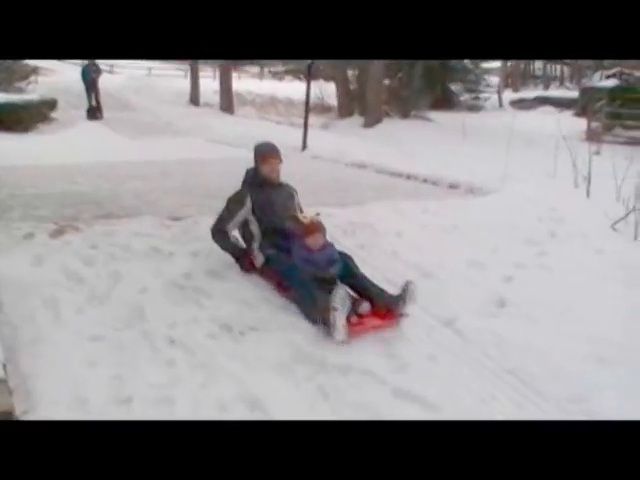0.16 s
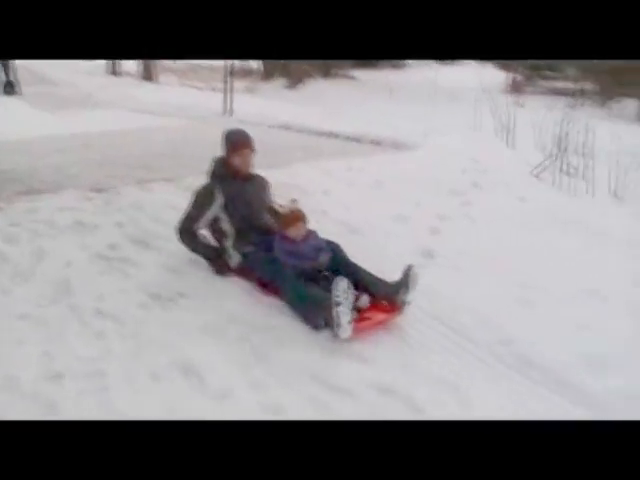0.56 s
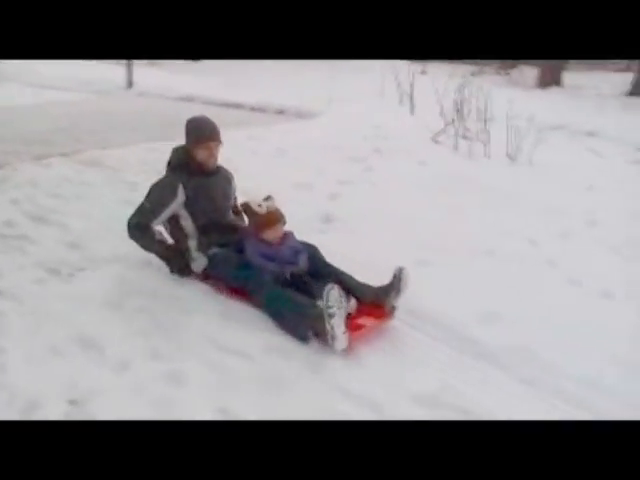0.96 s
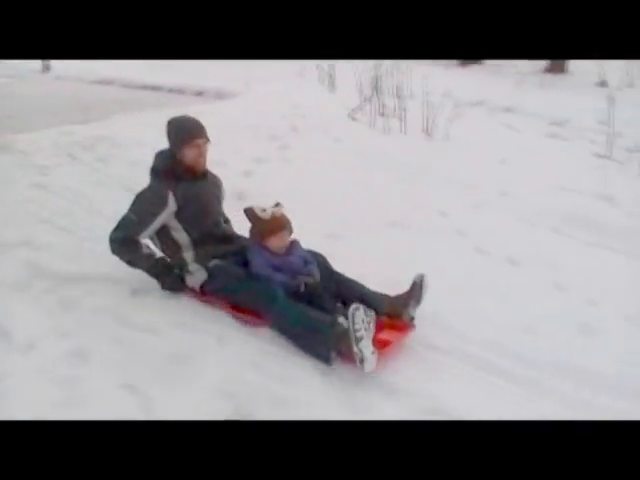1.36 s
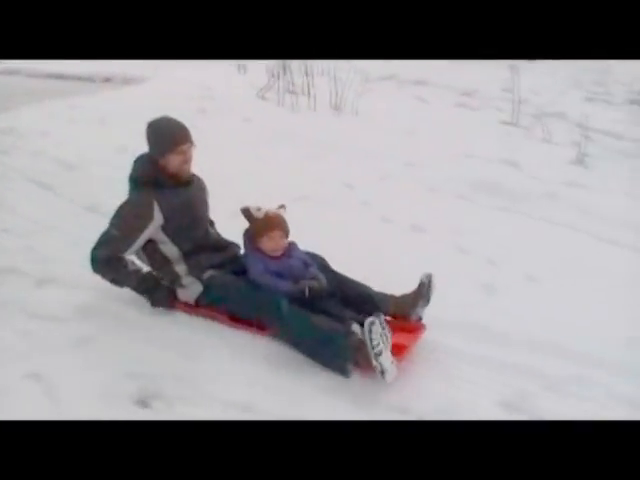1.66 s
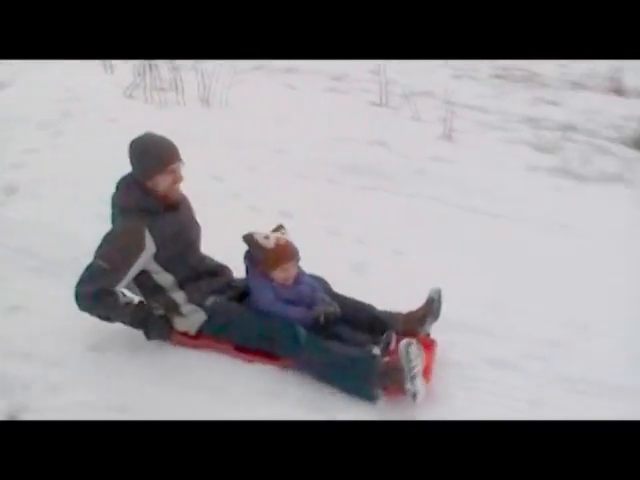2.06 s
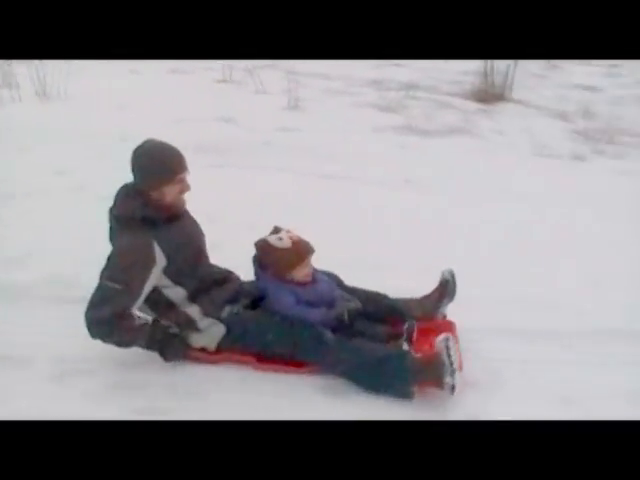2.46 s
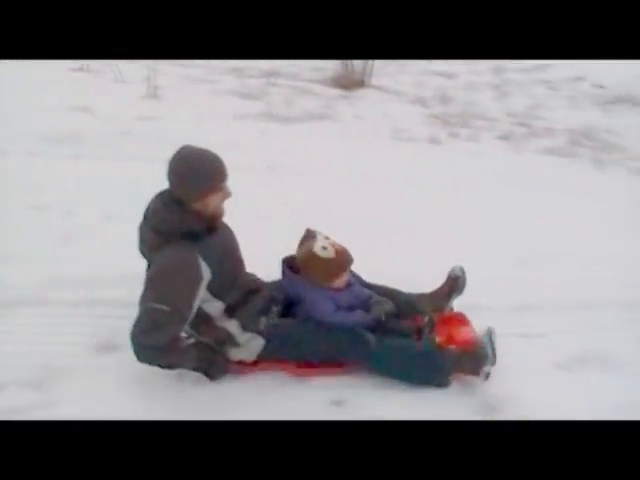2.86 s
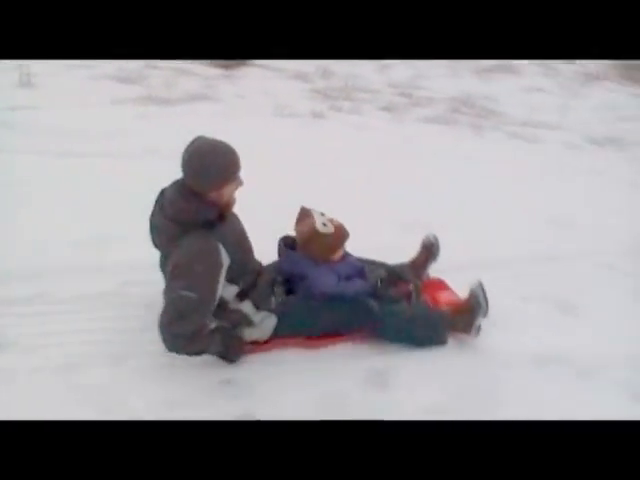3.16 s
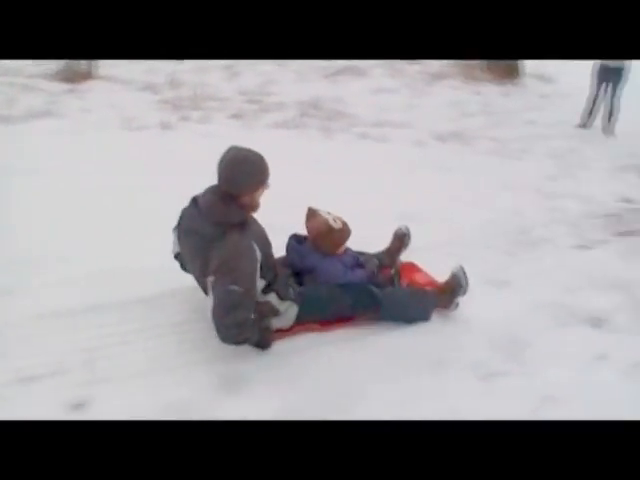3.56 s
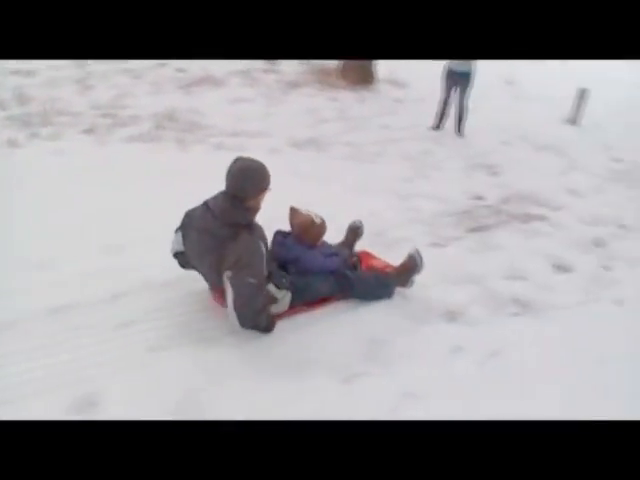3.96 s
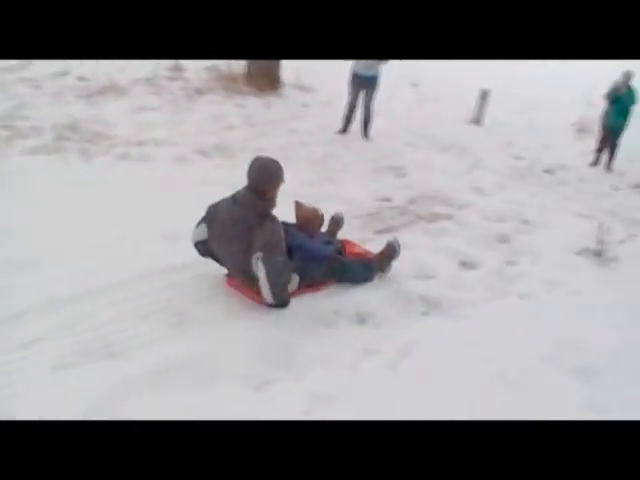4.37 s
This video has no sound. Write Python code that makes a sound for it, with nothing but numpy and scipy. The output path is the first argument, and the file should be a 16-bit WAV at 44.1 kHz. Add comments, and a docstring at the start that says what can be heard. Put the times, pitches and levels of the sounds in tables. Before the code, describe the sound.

A loaded plastic sled scrapes past over trodden snow with a grainy hiss, sharp crunches, icy snaps, hollow knocks and brief squeaks.

```python
"""Sled sliding past over snow

A loaded plastic sled slides past a camera over trodden snow. Filtered grainy noise makes the hiss of crushed
crystals, the hull's drumming and the rumble; plain noise makes the powder spray. Lumps crunch as noise bursts
and ring a hull resonance. Crusts snap as damped modes, the belly thuds as low decaying sines, and the plastic
squeaks in short gliding tones. The image opens briefly now and then, toward the right."""
import sys
import numpy as np
from scipy import signal
from scipy.fft import rfft, irfft, next_fast_len
from scipy.io import wavfile
from scipy.ndimage import uniform_filter1d

SR = 44100
rng = np.random.default_rng(int(sys.argv[2]) if len(sys.argv) > 2 else 0)


def dump(signal):
    """Clip the signal to [-1, 1] and save it as 16-bit WAV at the path in sys.argv[1]."""
    limited = np.clip(np.atleast_2d(signal).T, -1, 1)
    pcm = np.round(limited * 32767).astype(np.int16)
    wavfile.write(sys.argv[1], SR, pcm)


def gain_from_decibels(decibels):
    """Convert decibel values to linear amplitude factors."""
    exponent = np.asarray(decibels, float) / 20
    return 10 ** exponent


N = 199773
TIME = np.arange(N) / SR
REFERENCE_LOAD_DB = -25  # load changes are counted from here


def colour(x, table):
    """Shape a spectrum by (f/Hz, level/dB) points, joined on a log frequency axis."""
    hz, db = np.transpose(table)
    size = next_fast_len(N)
    f = np.maximum(np.fft.rfftfreq(size, 1 / SR), 1)
    gain = gain_from_decibels(np.interp(np.log(f), np.log(hz), db))
    return irfft(rfft(x, size) * gain, size)[..., :N]


def unit(x):
    """Scale to rms 1."""
    return x / np.sqrt(np.mean(x ** 2))


def walk(rate):
    """Random levels held for 1 / rate seconds and slewed, with rms 1."""
    hold = max(int(SR / rate), 2)
    levels = rng.standard_normal(N // 2 + 1)
    return unit(uniform_filter1d(levels[np.arange(N) // hold], hold // 2 + 1))


def grains(spread_db):
    """Dense breaking crystals: noise with a few much larger grains among its samples."""
    size = np.minimum(rng.exponential(size=N), 6)
    return unit(rng.standard_normal(N) * gain_from_decibels(spread_db * size))


def patches(x, edges_hz, rate, depth_db):
    """Split a sound into bands that flicker in level, each on its own; rises are capped."""
    f = np.fft.rfftfreq(N, 1 / SR)
    spectrum = rfft(x)
    out = np.zeros(N)
    for lo, hi in zip(edges_hz, edges_hz[1:]):
        flicker = gain_from_decibels(depth_db * np.minimum(walk(rate), 1.5))
        out += flicker * irfft(spectrum * ((f >= lo) & (f < hi)), N)
    return out


def burst(start, length, rise):
    """Pressure of one lump: quick rise, a short hold while it crumbles, then it is gone."""
    t = np.maximum(TIME[int(start * SR):int((start + .12) * SR)] - start, 0)
    return (1 - np.exp(-t / rise)) * np.exp(-(t / length) ** 2.3)


def add(into, start, piece):
    """Mix a piece in at a time in seconds."""
    i = int(start * SR)
    into[i:i + len(piece)] += piece


# the snow under the sled: (t/s, crushing load level/dB, crust hardness level/dB)
SNOW_TRACK = [(0, -26.5, -9), (.25, -25.5, 4), (.52, -23, -1), (.66, -25, 4.5), (.86, -24.5, -3),
              (1.1, -26.5, 11), (1.24, -28.5, -5), (1.55, -25, -3.5), (1.85, -22, 1), (1.98, -23, -2),
              (2.1, -21.5, -0.5), (2.28, -21, 0), (2.45, -22, -3), (2.64, -20, 5), (2.82, -22, 0.5),
              (3.1, -25, -3), (3.3, -23, 7), (3.46, -20, -2.5), (3.56, -25, 5), (3.8, -21.5, -0.5),
              (4.05, -20.5, 0), (4.35, -23, -3), (4.53, -23, -13)]
# the sled skips over hollows: (start t/s, length t/s, full drop in load level/dB; very short ones drop less)
HOLLOWS = [(0.062, 0.16, 3), (0.306, 0.17, 2.5), (0.693, 0.034, 2.5), (0.76, 0.06, 5.5), (0.896, 0.042, 6),
           (1.113, 0.12, 2.5), (1.247, 0.13, 2.5), (1.394, 0.12, 2), (1.59, 0.018, 1), (1.656, 0.17, 3.5),
           (2.625, 0.16, 5), (2.955, 0.076, 3), (3.596, 0.053, 4.5), (3.661, 0.043, 8.5),
           (3.773, 0.031, 6.5), (4.23, 0.089, 3.5)]


def load():
    """Crushing load in dB: the slow run of the track, cut by hollows and shaken by uneven snow."""
    lift_s, land_s = 0.041, 0.011  # the load fades into a hollow and returns at its far edge
    s, load_db, _ = np.transpose(SNOW_TRACK)
    lifted_db = np.zeros(N)
    for start, length, drop_db in HOLLOWS:
        fade = np.minimum((TIME - start) / lift_s, (start + length - TIME) / land_s)
        lifted_db += drop_db * np.clip(fade, 0, 1)
    return np.interp(TIME, s, load_db) - lifted_db + 0.046 * walk(40) + 0.29 * walk(100)


# spectrum of crushed crystals: (f/Hz, relative level/dB)
CRYSTAL_COLOUR = [(1060, -13), (1800, 1), (2520, -1.5), (2910, -7), (3780, -2.5), (6760, -0.5), (8140, 1),
                  (12100, -11.5), (12800, -16), (13500, -94)]


def hiss(change_db):
    """Crystals crush under the runners; the hiss follows the load fully."""
    crystals = unit(colour(grains(spread_db=2.5), CRYSTAL_COLOUR))
    # crystals of different size break at different moments
    crystals = patches(crystals, [0, 2600, 4200, 6500, 10000, 20000], rate=45, depth_db=1.23)
    # and the colour drifts in narrow patches
    narrow_hz = [0, 1500, 2000, 2500, 3100, 3700, 4400, 5200, 6000, 6900, 7900, 9000, 10300, 20000]
    crystals = patches(crystals, narrow_hz, rate=14, depth_db=1.5)
    return gain_from_decibels(REFERENCE_LOAD_DB + change_db) * crystals


# spectrum of the drumming hull: (f/Hz, relative level/dB)
HULL_COLOUR = [(210, -19), (350, -16), (600, 3), (993, 2.5), (1080, 2.5), (1360, 1.5), (1930, -2.5),
               (3000, -13), (3900, -15), (6600, -120)]


def drumming(change_db):
    """The hull drums with the load; harder snow excites the upper panels more than the belly."""
    passes_s, turn_s, shaded_db = 3.85, 0.19, -5.5  # once past, the riders shade the hull
    s, _, hard_db = np.transpose(SNOW_TRACK)
    bright_db = np.interp(TIME, s, hard_db) + 1.45 * walk(14)
    shade_db = shaded_db / (1 + np.exp((passes_s - TIME) / turn_s))
    hull_db = -2 + change_db + shade_db + 0.82 * walk(14)
    drum = unit(colour(grains(spread_db=3.5), HULL_COLOUR))
    drum = patches(drum, [0, 650, 950, 1400, 2000, 20000], rate=25, depth_db=1.5)
    belly = signal.sosfiltfilt(signal.butter(2, 1200, fs=SR, output="sos"), drum)
    upper_panels = drum - belly
    hull = gain_from_decibels(-bright_db / 2) * belly + gain_from_decibels(bright_db / 2) * upper_panels
    return gain_from_decibels(REFERENCE_LOAD_DB + hull_db) * hull


# spectrum of the rumble: (f/Hz, relative level/dB)
RUMBLE_COLOUR = [(53, -64), (90, -96), (140, -27), (210, -4.5), (344, -4.5), (500, 1.5), (650, -7.5),
                 (1100, -120)]


def rumble(change_db):
    """Low grainy noise that follows about half of each load change in dB and swells while the sled is close."""
    nearest_s, span_s, near_db = 3.07, 0.78, 4.5
    swell_db = near_db * np.exp(-((TIME - nearest_s) / span_s) ** 2)
    rumble_db = -14 + 0.53 * change_db + swell_db + 3.08 * walk(14)
    low = unit(colour(grains(spread_db=5.5), RUMBLE_COLOUR))
    low = patches(low, [0, 150, 260, 20000], rate=12, depth_db=2.0)
    return gain_from_decibels(REFERENCE_LOAD_DB + rumble_db) * low


# spectrum of the powder: (f/Hz, relative level/dB)
SPRAY_COLOUR = [(1200, -30), (2600, 0), (4200, 2), (7000, 3), (10000, 0), (12500, -11), (13500, -31)]


def spray():
    """Fine powder thrown up behind the sled: a thin hiss that swells slightly and never stops."""
    powder = unit(colour(rng.standard_normal(N), SPRAY_COLOUR))
    return gain_from_decibels(-34.5 + 1.5 * walk(3.5)) * powder


# lumps crushed: (t/s, crunch level/dB, hull ring level/dB re crunch, crumbling t/s, hull tone f/Hz)
LARGE_LUMPS = [(0.003, -41, 16, 0.05, 1050), (0.213, -26.5, 0.5, 0.065, 840), (0.475, -26, 3, 0.038, 960),
               (0.518, -22.5, 3, 0.022, 790), (0.58, -13.5, -16, 0.0035, 654),
               (0.607, -21.0, -18, 0.0038, 1700), (0.731, -14.5, -11, 0.0061, 900),
               (0.739, -16.5, -0.5, 0.01, 840), (0.755, -29, 2, 0.018, 1090),
               (0.821, -15, -0.5, 0.0069, 816), (0.856, -24, -0.5, 0.017, 820),
               (0.891, -26, 6.5, 0.0056, 754), (1.001, -23, -5, 0.013, 1240), (1.092, -21.5, -8, 0.02, 824),
               (1.21, -23.5, -8, 0.025, 1040), (1.234, -23, 5, 0.0066, 800), (1.289, -31, 9.5, 0.0054, 854),
               (1.29, -29.5, 8, 0.014, 1500), (1.312, -18.5, 6, 0.0056, 810),
               (1.366, -15.5, -16, 0.0078, 1140.0), (1.3695, -14.5, -7, 0.0043, 2150),
               (1.374, -25, 2, 0.008, 1290), (1.389, -15.5, -2.5, 0.0054, 1780),
               (1.404, -15.5, -7, 0.0036, 1840), (1.414, -30, 6, 0.0066, 940), (1.456, -30, 3, 0.019, 1500),
               (1.47, -30, 6, 0.0055, 710), (1.516, -15, -5, 0.0047, 1410), (1.522, -15, -9, 0.0086, 895),
               (1.584, -20, -4, 0.017, 1140.0), (1.606, -12, -10, 0.014, 1680),
               (1.621, -21, -1, 0.015, 940), (1.759, -27.5, 7.5, 0.0063, 770),
               (1.832, -29, 6, 0.0051, 1290), (1.846, -19, -4, 0.017, 1190), (1.885, -19.5, -3, 0.013, 850),
               (1.903, -18.5, -5, 0.017, 1850), (1.962, -20, 0, 0.022, 1190),
               (1.999, -16, -4, 0.0089, 1710), (2.055, -13, -12, 0.0064, 810),
               (2.08, -14.5, -16, 0.0077, 1600), (2.277, -16.5, 0, 0.0097, 1140),
               (2.625, -20, -14, 0.012, 1040), (2.645, -26, -2, 0.0035, 1030),
               (2.702, -17.5, -11, 0.006, 3900), (2.711, -28, 6, 0.0031, 1500),
               (2.776, -28, 2, 0.016, 1940), (2.788, -15.5, -1, 0.0099, 1150),
               (2.798, -17.5, 2.5, 0.028, 1115), (2.838, -19, 7, 0.0043, 1090),
               (2.843, -18.5, -8, 0.02, 2250), (2.9164, -21, -1, 0.031, 796),
               (2.94, -27.5, 5.5, 0.019, 1060), (3.039, -20, -7, 0.037, 1020.0),
               (3.117, -21.5, -4, 0.029, 813), (3.219, -21.5, -19, 0.023, 990),
               (3.314, -18.5, -11, 0.043, 840), (3.385, -13.5, -12, 0.011, 1710),
               (3.437, -17, -14, 0.012, 1730.0), (3.457, -19.5, -3.5, 0.041, 1060),
               (3.499, -24.5, 2.5, 0.023, 1490), (3.517, -33, -2, 0.02, 1210), (3.559, -34, 3, 0.016, 596),
               (3.651, -22, 0, 0.015, 1140), (3.683, -22, -4, 0.043, 1570), (3.761, -17, -3, 0.015, 645),
               (3.851, -24, -1, 0.027, 1450), (4.02, -21, -13, 0.017, 1610.0),
               (4.071, -23, -3, 0.011, 1550), (4.122, -18, -1.5, 0.017, 470), (4.149, -21, 2, 0.02, 665),
               (4.197, -23, -17, 0.026, 1860), (4.35, -20.5, -15, 0.016, 1430.0),
               (4.446, -16.5, -15, 0.0064, 860)]
# spectrum of a crumbling lump: (f/Hz, relative level/dB)
CRUNCH_COLOUR = [(760, -39), (1300, -0.5), (2320, -1.5), (4420, 0.5), (6190, 1.5), (8350, 3.5),
                 (11300, -10.5), (13000, -14)]


def lumps(change_db):
    """Each lump crumbles in coarse grains; the first blow and the crumbling ring the hull around one tone."""
    coarse = unit(colour(grains(spread_db=2.5), CRUNCH_COLOUR))
    knock = rng.standard_normal(N)
    crunch, drum = np.zeros(N), np.zeros(N)
    sharpness = 6.5  # Q of the hull resonance
    for s, crunch_db, ring_db, length, hz in LARGE_LUMPS + crumbs(change_db):
        push = burst(s, length, rise=0.061 * length)
        add(crunch, s, gain_from_decibels(crunch_db) * push)
        i = int(s * SR)
        shake = push * knock[i:i + len(push)]
        shake[1] += gain_from_decibels(14.5)  # the first blow
        ring = signal.lfilter(*signal.iirpeak(hz, sharpness, fs=SR), shake)
        ring /= np.sqrt(np.pi * hz / sharpness / SR)  # even out the level across bandwidths
        add(drum, s, gain_from_decibels(crunch_db + ring_db) * ring)
    bass_cut = signal.butter(2, 380, "high", fs=SR, output="sos")
    return crunch * coarse + signal.sosfilt(bass_cut, drum)


def crumbs(change_db):
    """Rows for small lumps met at random, in the same form as the large ones; weaker when the load is off."""
    per_s, base_db, spread_db, length_s = 70, -33, 5, 0.0072
    when, size, ring, span, tone = rng.random((int(per_s * N / SR), 5)).T
    s = when * (N / SR - .15)
    db = base_db + change_db[(s * SR).astype(int)] - spread_db * np.log(1 - 0.64 * size)
    ring_db = -4 + 8 * (ring - .5)
    return list(zip(s, db, ring_db, length_s * (.5 + span), 620 * 2.7 ** tone))


# hard ice crusts: (t/s, level/dB, brightness level/dB per two octaves)
CRUST_SNAPS = [(0.5275, -23, -8), (0.6545, -19, 0), (0.701, -25, -4), (0.7439, -20, -8), (1.1693, -27, -14),
               (1.235, -21, -6), (0.7331, -17, 2), (0.7345, -13, 0), (1.2895, -13, -6), (1.3135, -11, -7),
               (2.6393, -10, -4), (1.371, -17, -4), (1.852, -19, -6), (1.888, -23, -8), (1.902, -14, -3),
               (1.9203, -22, -4), (1.962, -22, -9), (1.968, -25, -3), (1.975, -31, -5), (2.002, -17, 0),
               (2.082, -14, -2), (2.187, -26, 0), (2.204, -27, 0), (2.705, -13, 9), (2.708, -13.5, 9),
               (3.131, -28, -4), (3.232, -18, -2), (3.469, -13, -5), (3.958, -19, -6), (4.072, -20, 0),
               (4.127, -21, -3), (2.7765, -16, -8)]
# heavily damped hull modes, tuned before each snap bends them: (f/Hz, level/dB, 60 dB decay t/s)
SNAP_MODES = [(700, -2, .014), (1150, 0, .011), (1850, -3, .008), (2700, -6, .006), (3950, -4, .007)]


def snaps(change_db):
    """One sharp blow rings the damped hull modes, retuned each time; small ones come at random with the load."""
    small_per_s, small_db = 40, -27
    out, t = np.zeros(N), TIME[:SR // 20, None]
    hz, mode_db, t60 = np.transpose(SNAP_MODES)
    when, size, bright = rng.random((int(small_per_s * N / SR), 3)).T
    when = when * (N / SR - .06)
    level_db = small_db + change_db[(when * SR).astype(int)] + 6 * (size - .5)
    blows = CRUST_SNAPS + list(zip(when, level_db, 8 * (bright - .7)))
    bends = rng.standard_normal((len(blows), len(hz)))
    decay = np.exp(-np.log(1000) * t / t60)
    for (s, db, bright_db), bend in zip(blows, bends):
        gain = gain_from_decibels(db + mode_db + bright_db * np.log2(hz / hz[1]) / 2)  # tilted about the second mode
        modes = gain * np.sin(2 * np.pi * hz * (1 + 0.091 * bend) * t) * decay
        add(out, s, modes.sum(axis=1))
    return out


# the belly thuds on bumps: (t/s, level/dB)
BELLY_THUDS = [(0.074, -24), (0.18, -27.5), (0.308, -33), (0.471, -36), (0.638, -23.5), (0.893, -24),
               (1.071, -33), (1.165, -30), (1.401, -27), (1.554, -23), (1.868, -24), (2.708, -33),
               (2.768, -20), (2.949, -28), (3.224, -27), (3.327, -27), (3.44, -21), (3.469, -28),
               (3.564, -25), (4.126, -40)]


def thuds():
    """A low, quickly damped flex of the whole belly, around a slightly different pitch each time."""
    centre_hz, t60_s = 246, 0.035
    out, t = np.zeros(N), TIME[:SR // 8]
    decay = np.exp(-np.log(1000) * t / t60_s)
    for (s, db), bend in zip(BELLY_THUDS, rng.standard_normal(len(BELLY_THUDS))):
        flex = np.sin(2 * np.pi * centre_hz * (1 + .12 * bend) * t)
        add(out, s, gain_from_decibels(db) * flex * decay)
    return out


# the hull squeaks on packed snow: (t/s, length t/s, start f/Hz, f/Hz after one length, level/dB)
PLASTIC_SQUEAKS = [(0.822, 0.0078, 830, 790, -26), (1.215, 0.0083, 986, 950, -24),
                   (1.239, 0.0098, 560, 516, -23), (1.297, 0.015, 683, 614, -21),
                   (1.318, 0.006, 744, 686, -25), (1.547, 0.017, 1230, 1200, -24),
                   (1.606, 0.016, 1736, 1660, -20), (1.852, 0.015, 790, 760, -22),
                   (1.88, 0.015, 643, 617, -20), (1.912, 0.013, 655, 650, -17.5),
                   (1.942, 0.021, 634, 620, -19), (1.986, 0.022, 1245, 1290, -22.5),
                   (2.058, .018, 827, 810, -23), (2.075, 0.015, 670, 654, -26),
                   (2.775, 0.013, 688, 676, -13), (2.792, 0.012, 1370, 1190, -15),
                   (2.803, 0.029, 1107, 1097, -19), (2.852, 0.017, 686, 624, -23)]
# fundamental and two overtones of a squeak: (relative level/dB)
SQUEAK_PARTIALS_DB = [-2.5, -8, -19]


def squeaks():
    """The hull sticks and slips: short, slightly wavering tones with two overtones; each swells fast and throbs."""
    out, waver, throb = np.zeros(N), 0.01 * walk(150), gain_from_decibels(1.5 * walk(200))
    for s, length, start_hz, end_hz, db in PLASTIC_SQUEAKS:
        i = int(s * SR)
        u = np.arange(int(1.5 * length * SR)) / (length * SR)  # time in lengths; the tail runs past 1
        hz = (start_hz + (end_hz - start_hz) * u) * (1 + waver[i:i + len(u)])
        phase = 2 * np.pi * np.cumsum(hz) / SR
        tone = sum(gain_from_decibels(p_db) * np.sin((k + 1) * phase) for k, p_db in enumerate(SQUEAK_PARTIALS_DB))
        swell = np.minimum(u / 0.088, 1) * np.exp(-u ** 3)
        add(out, s, gain_from_decibels(db) * np.sqrt(2) * tone * throb[i:i + len(u)] * swell)
    return out


def scattered(sled):
    """Five short delays of the sled, alternating in sign."""
    lags = (SR * np.array([.0013, .0031, .0074, .0117, .0169])).astype(int)
    return sum((-1) ** k * np.roll(sled, lag) for k, lag in enumerate(lags)) / np.sqrt(len(lags))


# moments when the stereo image opens: (centre t/s, length t/s)
OPENINGS = [(.0, 0.04), (0.328, 0.075), (0.497, 0.072), (1.181, 0.075), (1.521, 0.16), (1.776, 0.07),
            (1.907, 0.077), (2.375, 0.075), (2.544, 0.065), (2.756, 0.16), (3.331, 0.12), (3.782, 0.075),
            (3.911, 0.064), (4.039, 0.071), (4.256, 0.071)]
# spectrum of the side sound: (f/Hz, level/dB)
WIDTH_COLOUR = [(100, 1), (500, -1), (4000, 0), (8000, 0.5), (13000, 5.5)]


def opened(sled, scatter):
    """Side signal of the brief openings; the inverted share of the sled draws them to the right."""
    spread = colour(scatter - .5 * sled, WIDTH_COLOUR)
    opening = sum(np.clip((length / 2 - abs(TIME - s)) / 0.022, 0, 1) for s, length in OPENINGS)
    return gain_from_decibels(-14.5) * np.sin(np.pi / 2 * opening) * spread


def leaning(sled, scatter):
    """Side signal in the drumming's range, off centre until the sled is abreast, then far weaker."""
    fade_db_per_s, ends_s, drop_db = 0.5, 2.98, -21
    # only scattered patches lean at any one time
    hull_band = patches(0.2 * scatter - sled, np.arange(400, 1350, 85), rate=9.2, depth_db=12.0)
    lean_db = -19.5 - fade_db_per_s * TIME + drop_db / (1 + np.exp((ends_s - TIME) / 0.16))
    return gain_from_decibels(lean_db) * unit(hull_band) * np.std(sled)


def scene():
    """Mix the sled in the centre and add the side signals, in opposite sign left and right."""
    change_db = load() - REFERENCE_LOAD_DB
    sled = hiss(change_db) + drumming(change_db) + rumble(change_db) + spray()
    sled += lumps(change_db) + snaps(change_db) + thuds() + squeaks()
    scatter = scattered(sled)
    side = opened(sled, scatter) + leaning(sled, scatter)
    return np.array([sled + side, sled - side])


def band_limit(x):
    """A steep low-pass at the top of the band."""
    return signal.sosfilt(signal.butter(12, 13730, fs=SR, output="sos"), x)


def record(dry):
    """The camera rounds the highest peaks and cuts the deep bass and the top steeply."""
    rounded = np.tanh(1.095 * dry) / 1.576
    wet = signal.sosfilt(signal.butter(14, 136, "high", fs=SR, output="sos"), rounded)
    wet = signal.sosfilt(signal.ellip(10, .3, 80, 12650, fs=SR, output="sos"), wet)
    return band_limit(wet)


dry = scene()
out = record(dry)
dump(out)
```